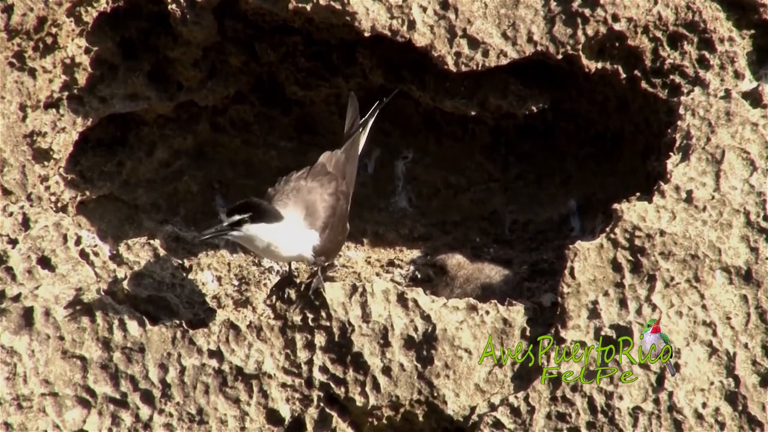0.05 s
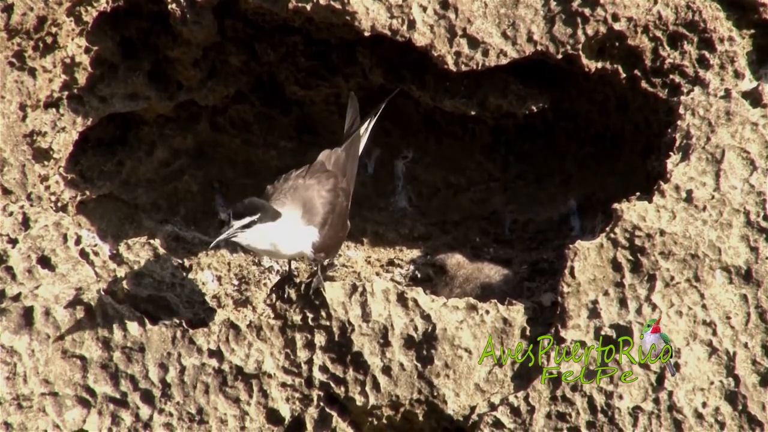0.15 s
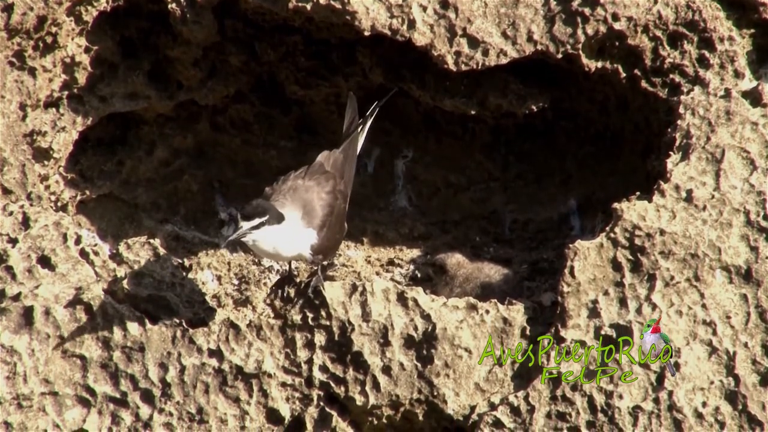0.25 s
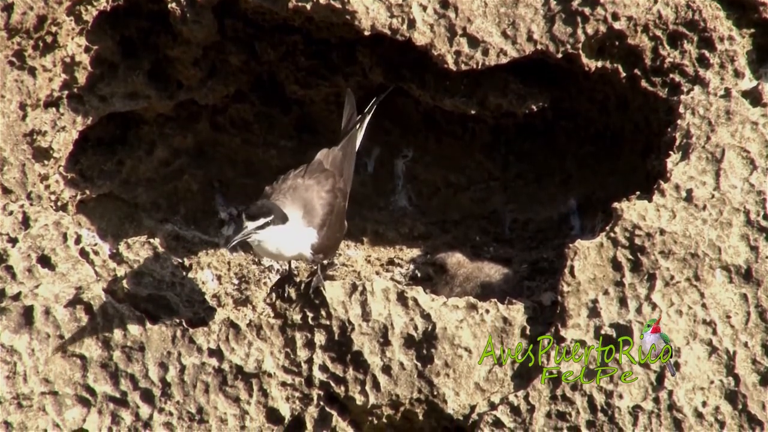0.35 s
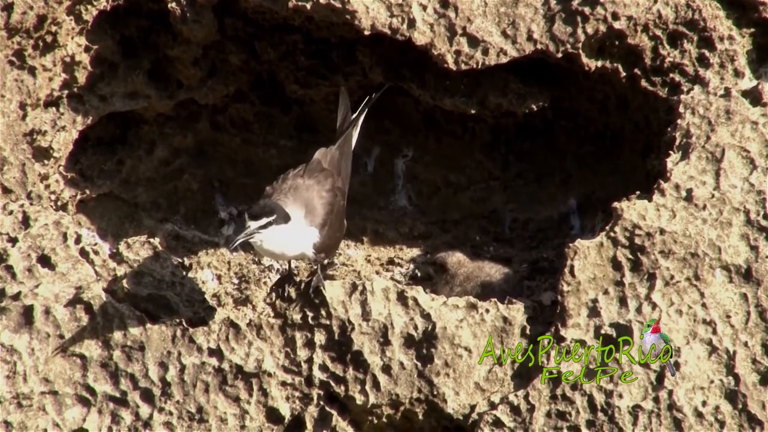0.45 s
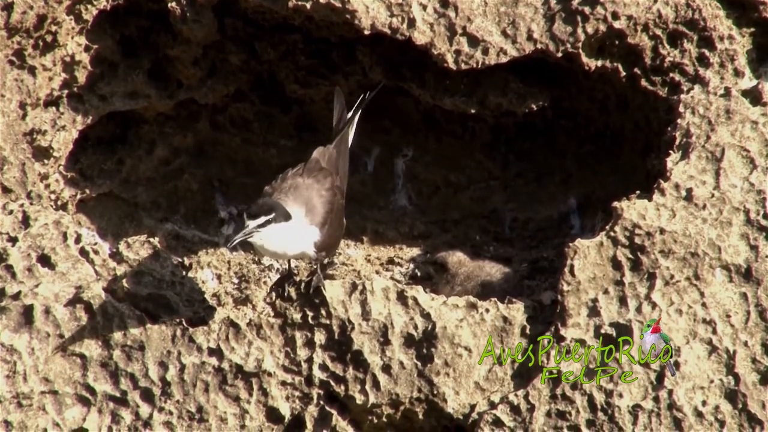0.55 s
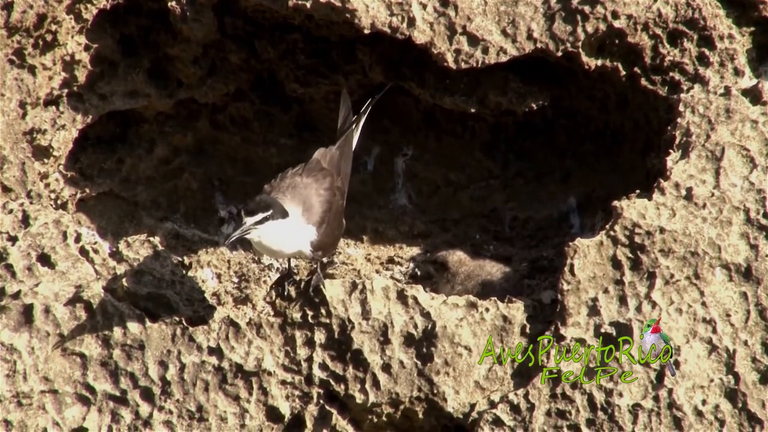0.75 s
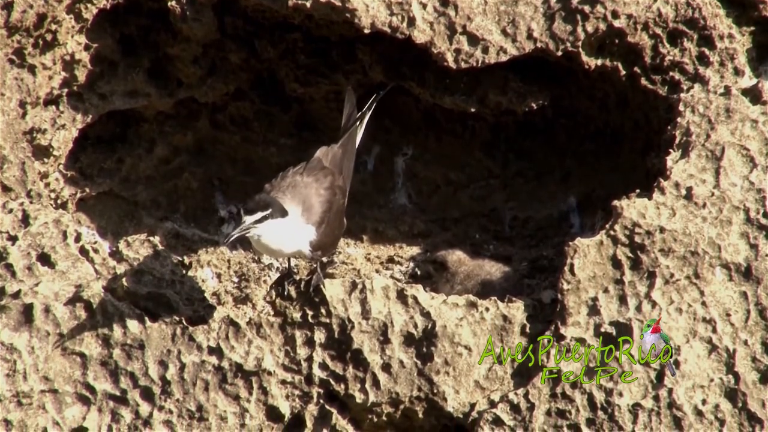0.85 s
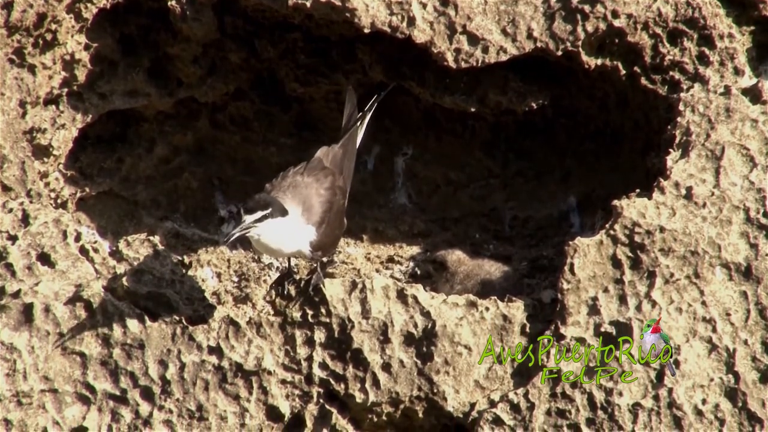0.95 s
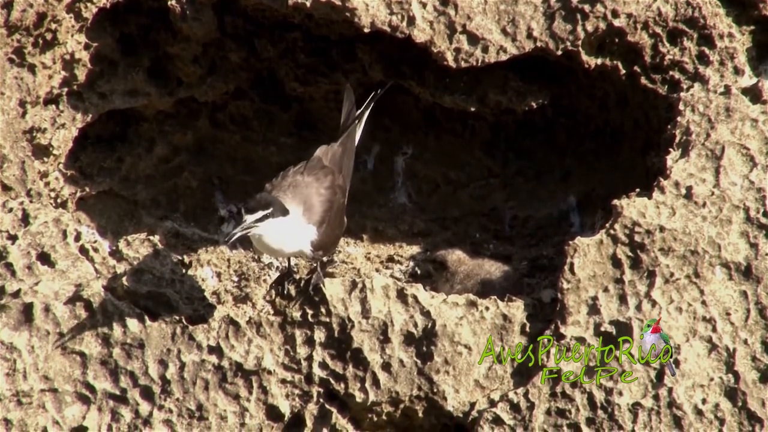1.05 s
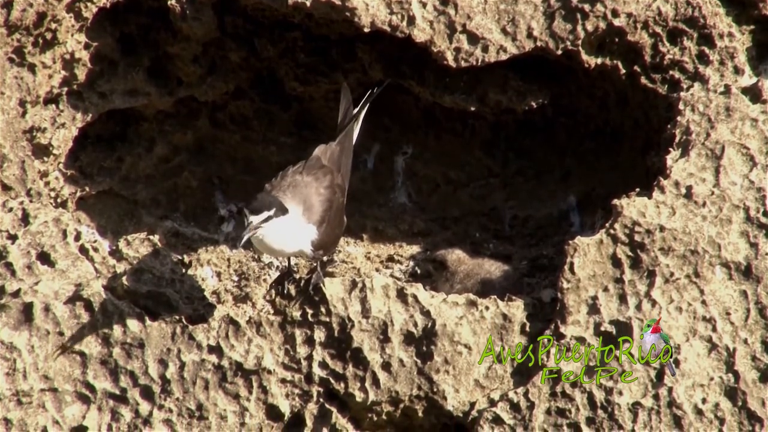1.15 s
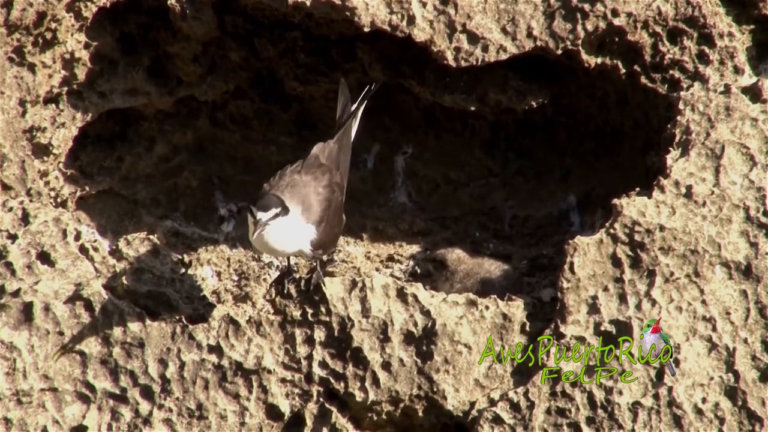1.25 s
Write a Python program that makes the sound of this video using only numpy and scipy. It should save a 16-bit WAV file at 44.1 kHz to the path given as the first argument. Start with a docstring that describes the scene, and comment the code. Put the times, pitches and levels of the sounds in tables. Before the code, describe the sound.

A tern gives two harsh, nasal calls, each about a tenth of a second, at 0.2 and 0.7 seconds. Each arches up in pitch, clear at its peak and raspy at both ends, with a short rocky echo. Hollow-toned surf washes steadily, swelling near 0.5, with low wind rumble and fluttering gusts. A soft water plop comes near 0.95, then very faint falling bird whistles from 1.1 to the end at 1.3.

```python
"""A tern gives two short, harsh calls from a hollow in a rocky cliff.
Each is a jittering pulse train with puffs of air, arching up in pitch: clear at the top, rasping at both ends.
Discrete echoes and a decaying noise tail make the rock. Surf is filtered noise that swells and flickers;
gusts and rumble on the microphone are low noise, largely opposite in the two channels.
A soft sine plop sounds in the surf, and a far bird's falling sine whistles come faintly near the end."""
import sys
import numpy as np
from scipy import signal
from scipy.fft import rfft, irfft
from scipy.io import wavfile
from scipy.ndimage import uniform_filter1d

SR = 44100
rng = np.random.default_rng(int(sys.argv[2]) if len(sys.argv) > 2 else 0)


def transcribe(u):
    """Save the signal u as a 16-bit wav file named by the first command-line argument.

    u: samples, shape (n,) or (channels, n), limited to [-1, 1]; the rate is SR.
    q: integer samples, one column per channel.
    """
    v = np.clip(np.atleast_2d(u).T, -1, 1)
    q = np.round(v * 32767).astype(np.int16)
    wavfile.write(sys.argv[1], SR, q)


N = 57330


def amp(db):
    """Decibels to gain."""
    return 10 ** (np.asarray(db) / 20)


def unit(x):
    """Scales to an rms of 1."""
    return x / np.sqrt(np.mean(x ** 2) + 1e-20)


def read(points, hz):
    """Reads a spectrum table on a log-frequency axis."""
    f, value = np.transpose(points)
    return np.interp(np.log(hz + 1), np.log(f + 1), value)


def level(points):
    """Gain over the whole scene from (s, dB) points."""
    return amp(np.interp(np.arange(N) / SR, *np.transpose(points)))


def add(mix, s, sound):
    """Mixes a sound in at a time in seconds."""
    part = mix[round(s * SR):][:len(sound)]
    part += sound[:len(part)]


def colour(x, points):
    """Filters by a spectrum table, without shifting phase."""
    length = x.shape[-1]
    size = 2 * length
    gain = amp(read(points, np.fft.rfftfreq(size, 1 / SR)))
    return irfft(rfft(x, size) * gain, size)[..., :length]


def wander(size, hz):
    """Smooth random movement of rms 1, mostly slower than the given rate."""
    smoothing = 1 + (np.fft.rfftfreq(N, 1 / SR) / hz) ** 4
    return unit(irfft(rfft(rng.standard_normal(N)) / smoothing, N))[:size]


def pair(two, same):
    """Gives two unrelated signals a left-right likeness: 1 alike, 0 unrelated, -1 opposite."""
    same = np.clip(same, -1, 1)
    return np.array([two[0], same * two[0] + np.sqrt(1 - same ** 2) * two[1]])


def pan(db):
    """Raises the left and lowers the right by the same dB."""
    return amp([[db], [-db]])


# The arch of each call. Each row: time in seconds, pitch in Hz, level in dB, roughness from 0 to 1.
FIRST_CURVE = [(.196, 544, -61, 0.52), (.206, 559.4, -47.5, 0.42), (.212, 578, -39.5, 0.42),
               (.215, 591.7, -43, .3), (.221, 630.5, -38, 0.15), (.231, 665.5, -37.5, 0.2),
               (.235, 686.8, -32.5, 0.12), (.243, 687.9, -31, .08), (.252, 696, -35.5, 0.11),
               (.261, 669, -31.5, 0.24), (.268, 570, -39.5, .5), (.28, 566.6, -39, .55),
               (.292, 546, -53, 0.3)]
SECOND_CURVE = [(.685, 543.4, -58, .6), (.697, 557.5, -47.5, 0.75), (.703, 563.8, -39.5, 0.31),
                (.71, 597.3, -45.5, 0.91), (.722, 637, -35.5, 0.28), (.731, 645.8, -36, 0.097),
                (.741, 646.2, -32, 0.091), (.751, 624, -38.5, 0.26), (.757, 582.2, -37.5, 0.64),
                (.765, 553, -44, 0.42), (.78, 579, -52.5, 0.82)]
# Throat and bill colour of each call. Each row: frequency in Hz, relative gain in dB.
FIRST_COLOUR = [(400, -50), (680, -29), (1000, -18), (1200, -2.5), (1400, -4.5), (1700, 6), (2060, 0.5),
                (2480, -3), (2760, -9), (3400, -12), (4100, -18.5), (4600, -25.5), (5300, -55.5),
                (7400, -44.5), (9500, -66.5), (11600, -55.5)]
SECOND_COLOUR = [(400, -36.5), (650, -27), (1000, -5.5), (1170, -8), (1300, -2), (1700, 3.5), (1950, -1),
                 (2600, -8), (3200, -14.5), (3900, -21), (4550, -30), (5200, -54.5), (7000, -53),
                 (9500, -65.5), (11600, -51)]


def tern():
    """The two calls, each setting the cliff ringing by its own amount."""
    first = cliff(call(FIRST_CURVE, FIRST_COLOUR), tail_db=-3)
    second = cliff(call(SECOND_CURVE, SECOND_COLOUR), tail_db=0.5)
    return first + second


def call(curve, throat):
    """Syrinx pulses that jitter and creak where rough pass, with puffs of air, through the throat."""
    jitter, jitter_hz = 0.045, 275  # share of the pitch, at full roughness
    shimmer_db, shimmer_hz = 0.7, 80  # flutter of the partials, dB per step up to the sixth
    rasp_depth, rasp_hz = 0.9, 330
    creak_depth, creak_hz = 0.71, 171
    pulse_smear = 0.72  # radians, times the partial number squared
    puff_cycles, puff_share = 0.3, 0.6  # decay in pitch cycles, share of air at full roughness
    fade_in_s, fade_out_s = 0.006, 0.022

    s, pitch, db, rough = np.transpose(curve)
    t = np.arange(s[0], s[-1] + fade_out_s, 1 / SR)
    rough = np.clip(np.interp(t, s, rough), 0, 1)
    hz = np.interp(t, s, pitch) * (1 + jitter * rough * wander(len(t), jitter_hz))
    turns = np.cumsum(hz) / SR

    pulses = np.zeros(len(t))
    for k in range(1, 21):
        shimmer = amp(shimmer_db * min(k, 6) * wander(len(t), shimmer_hz))
        pulses += shimmer * np.cos(2 * np.pi * k * turns + pulse_smear * k ** 2)
    pulses = unit(pulses) * (1 + rasp_depth * rough * wander(len(t), rasp_hz))

    # each pitch cycle lets out a burst of noise that dies away
    puffs = unit(np.exp(-(turns % 1) / puff_cycles) * rng.standard_normal(len(t)))
    air = puff_share * rough
    creak_turns = np.cumsum(creak_hz * (1 + 0.15 * wander(len(t), 120))) / SR
    creak = 1 + creak_depth * rough * np.cos(2 * np.pi * creak_turns)
    voice = colour(creak * ((1 - air) * pulses + air * puffs), throat)

    # even out the loudness over about 12 ms, so that the curve alone sets the level
    voice = voice / np.sqrt(uniform_filter1d(voice ** 2, size=520) + 1e-12)
    fade_in = np.clip((t - t[0]) / fade_in_s, 0, 1)
    fade_out = np.clip((t[-1] - t) / fade_out_s, 0, 1)
    out = np.zeros(N)
    add(out, s[0], voice * amp(np.interp(t, s, db)) * fade_in * fade_out)
    return out


# Echoes off nearby rock. Each row: delay in seconds, level against the direct sound in dB.
NEAR_ROCK = [(.0043, -18.5), (.0112, -22.5), (.0195, -10), (0.03, -20), (0.055, -18)]


def cliff(x, tail_db):
    """Direct sound, a few echoes off the nearest rock, and a scattered tail."""
    wet_db, t60_s, build_s, tail_same = -11, 0.58, 0.0082, 0.7
    pan_db, lead_rad = 1.1, 0.29  # the left channel leads in phase

    near = x.copy()
    for delay, db in NEAR_ROCK:
        add(near, delay, amp(db) * x)
    turn = np.exp(1j * lead_rad * np.array([[.5], [-.5]]))
    near = (signal.hilbert(near) * turn).real

    t = np.arange(SR) / SR
    envelope = amp(-60 * t / t60_s) * (1 - np.exp(-t / build_s))
    tail = pair(rng.standard_normal((2, SR)), tail_same) * envelope
    wet = signal.fftconvolve(x[None], tail / np.linalg.norm(tail[0]), axes=1)[:, :N]
    return pan(pan_db) * near + amp(wet_db + tail_db) * wet


# Tone of the surf. Each row: frequency in Hz, relative density in dB per Hz.
SURF_TONE = [(100, -42.5), (300, -35), (450, -31), (600, -13), (750, -4), (1000, -0.5), (1400, -4),
             (2100, -2.5), (2600, -6), (3100, -8), (3700, -13), (4500, -18), (4950, -29.5), (7000, -39.5),
             (9000, -45.5), (11500, -50.5)]
# Slow swell of the surf. Each row: time in seconds, level in dB.
SURF_LEVEL = [(0, -58), (.16, -59), (.33, -54), (.48, -52.5), (.6, -55), (.85, -54.5), (.97, -55),
              (1.1, -56), (1.22, -56), (1.3, -56)]
# Width of the surf. Each row: frequency in Hz, left-right likeness from -1 to 1.
SURF_LIKENESS = [(100, -.3), (500, 0.73), (900, 0.7), (1400, 0.61), (2500, 0.64), (4500, 0.82),
                 (10000, 0.79)]


def surf():
    """A wash of noise that swells slowly, with drifting patches and a slight flicker."""
    patch_db, flicker_db, pan_db = 1.0, 0.5, 0.35
    hz = np.fft.rfftfreq(1024, 1 / SR)
    grid = (N // 256 + 5, 513)  # time frames, frequency bins
    noise = rng.standard_normal((2, *grid)) + 1j * rng.standard_normal((2, *grid))
    z = pair(noise, read(SURF_LIKENESS, hz))

    # random lifts and dips, smoothed over time and then over frequency
    patches = uniform_filter1d(rng.standard_normal(grid), size=9, axis=0)
    patches = unit(uniform_filter1d(patches, size=10, axis=1))
    z = z * amp(read(SURF_TONE, hz) + patch_db * patches)

    wash = signal.istft(z.transpose(0, 2, 1), nperseg=1024, noverlap=768)[1]
    flicker = amp(flicker_db * wander(N, 60))
    return unit(wash[:, :N]) * level(SURF_LEVEL) * flicker * pan(pan_db)


# Gusts on the microphone. Each row: start in seconds, length in seconds, strength in dB.
GUST_TIMES = [(0.053, 0.037, -9), (0.384, 0.121, 2), (0.593, 0.032, -1.5), (0.656, 0.055, 2.5),
              (0.71, 0.051, 4), (0.876, 0.047, -5.5), (1.025, 0.04, -16), (1.141, 0.085, 1),
              (1.197, .075, 2.5)]
# Tone of the gusts. Each row: frequency in Hz, relative density in dB per Hz.
GUST_TONE = [(30, -14), (110, -14.5), (200, -25.5), (400, -20), (520, -12), (650, -3), (770, 9.5),
             (920, -2.5), (1100, -6), (1600, -34), (4000, -64)]
# Tone of the rumble. Each row: frequency in Hz, relative density in dB per Hz.
RUMBLE_TONE = [(10, -12.5), (28, -1), (45, -4.5), (70, -24.5), (110, -24), (200, -42.5), (500, -40.5),
               (2000, -104.5)]
# Ebb and flow of the rumble. Each row: time in seconds, level in dB.
RUMBLE_FLOW = [(0, -62), (.08, -57), (.21, -70.5), (.3, -65), (.36, -69.5), (.43, -51), (.5, -52),
               (.57, -63.5), (.64, -57), (.75, -66.5), (.85, -73.5), (.95, -67), (1, -77.5), (1.05, -52.5),
               (1.11, -67.5), (1.17, -53), (1.3, -68)]


def wind():
    """Low rumble and short fluttering gusts of noise, largely opposite in the two channels."""
    gust_db, rise_s, fall_s = -53.5, 0.01, 0.043
    gust_same, rumble_same = -0.73, -0.65
    flutter_db, flutter_hz = 2.36, 70

    t = np.arange(N) / SR
    gusts = np.zeros(N)
    for start, length, db in GUST_TIMES:
        rise = np.clip((t - start) / rise_s, 0, 1)
        fall = np.clip((start + length - t) / fall_s + .5, 0, 1)  # halfway down at the end time
        gusts += amp(db) * rise * fall

    buffet = unit(colour(pair(rng.standard_normal((2, N)), gust_same), GUST_TONE))
    buffet = buffet * amp(flutter_db * wander(N, flutter_hz))
    rumble = unit(colour(pair(rng.standard_normal((2, N)), rumble_same), RUMBLE_TONE))
    return amp(gust_db) * gusts * buffet * pan(1.8) + rumble * level(RUMBLE_FLOW) * pan(-1.8)


# A faint plop of water. The one row: start in seconds, length in seconds, pitch in Hz, level in dB.
WATER_PLOP = (.945, .045, 1033, -56)


def plop():
    """A soft, short ring of water in the surf: one sine that swells and fades."""
    start, length, hz, db = WATER_PLOP
    t = np.arange(0, length, 1 / SR)
    swell = np.sin(np.pi * t / length) ** 2
    out = np.zeros(N)
    add(out, start, amp(db) * unit(swell * np.sin(2 * np.pi * hz * t)))
    return out


# Far whistles. Each row: start in seconds, length in seconds, first pitch in Hz, last pitch in Hz, level in dB.
FAR_WHISTLES = [(1.125, .11, 4530, 4180, -72.5), (1.196, .045, 4110, 3790, -67)]


def far_bird():
    """Thin, wavering, falling whistles: gliding sines that swell and fade."""
    waver, waver_hz = 0.0403, 330  # rms share of the pitch
    out = np.zeros(N)
    for start, length, from_hz, to_hz, db in FAR_WHISTLES:
        u = np.arange(0, length, 1 / SR) / length
        glide = from_hz + (to_hz - from_hz) * u
        hz = glide * (1 + waver * wander(len(u), waver_hz))
        tone = np.sin(2 * np.pi * np.cumsum(hz) / SR)
        add(out, start, amp(db) * unit(np.sin(np.pi * u) * tone))
    return out


def scene():
    """Birds at the cliff, surf, wind and a plop of water."""
    return tern() + surf() + wind() + plop() + cliff(far_bird(), tail_db=10)


# Narrow notches and peaks on all that reaches the microphone.
# Each row: centre in Hz, width (Gaussian sigma) in Hz, gain in dB.
COMB_COLOUR = [(433, 14, -8), (518, 14, -6.5), (671, 14, -4), (803, 14, -6), (895.6, 14, -11),
               (932, 30, 4.5), (1035, 8.8, -3.5), (1098, 22, -12), (1173, 67, 3), (1349, 14.5, -14.5),
               (1461, 18, 6), (1558, 24, -13), (1734, 22, 3.5), (1782, 30, -12), (1921.5, 9.9, -13),
               (2042.4, 26, 4.5), (2172, 29, -8.5), (2334, 18, -13), (2546, 25, -5), (2790, 42, -4.5),
               (3114, 13, 5.5), (3183, 13, 5), (3420, 45, -11.5), (3580, 22, 6.5), (3900, 25, 4.5),
               (4070, 18, -9.5), (4240, 12, 8.5), (4650, 19, -8.5), (4483, 21, 7), (4750, 12, -11),
               (4780, 14, -7.5), (4895, 22, -2)]


def record(dry):
    """A comb-like colour of narrow notches and peaks that ring briefly; then the band limit."""
    edge_hz = 11900
    hz = abs(np.fft.fftfreq(8192, 1 / SR))
    gain_db = sum(db * np.exp(-.5 * ((hz - f) / width) ** 2) for f, width, db in COMB_COLOUR)

    # minimum phase: the ringing follows the sound and never precedes it
    log_spectrum = np.conj(signal.hilbert(np.log(amp(gain_db))))
    ring = np.fft.ifft(np.exp(log_spectrum)).real[:4096]
    heard = signal.oaconvolve(dry, ring[None])[:, :N]

    lowpass = signal.firwin(511, edge_hz, window=("kaiser", 9), fs=SR)
    return signal.oaconvolve(heard, lowpass[None], "same")


dry = scene()
out = record(dry)
transcribe(out)
```